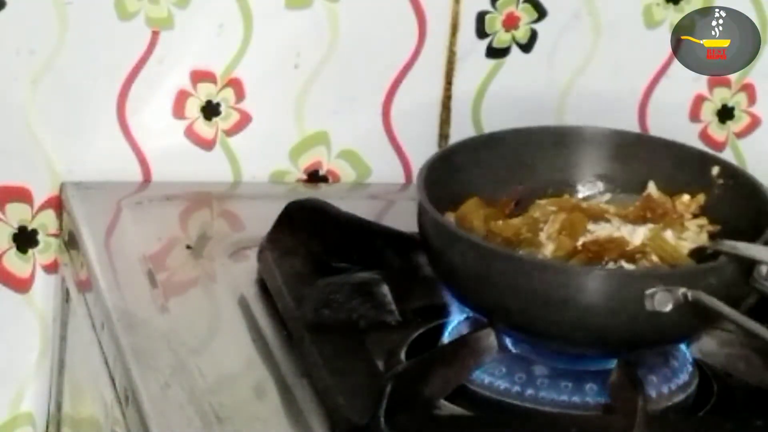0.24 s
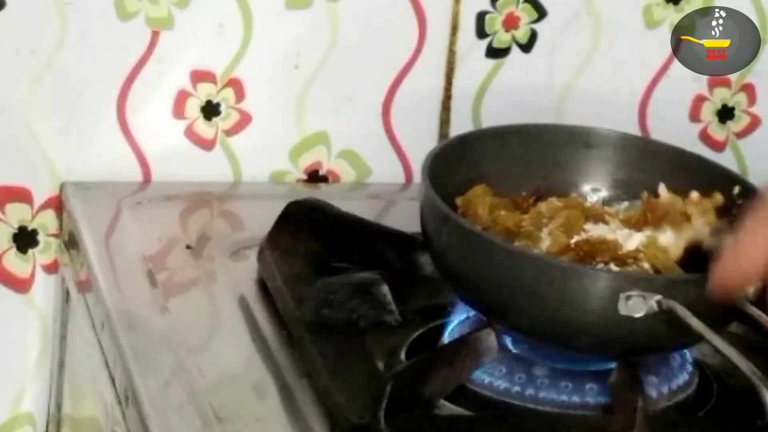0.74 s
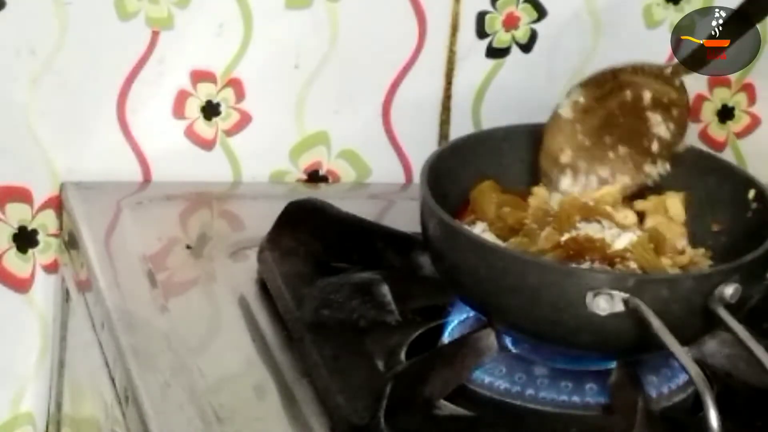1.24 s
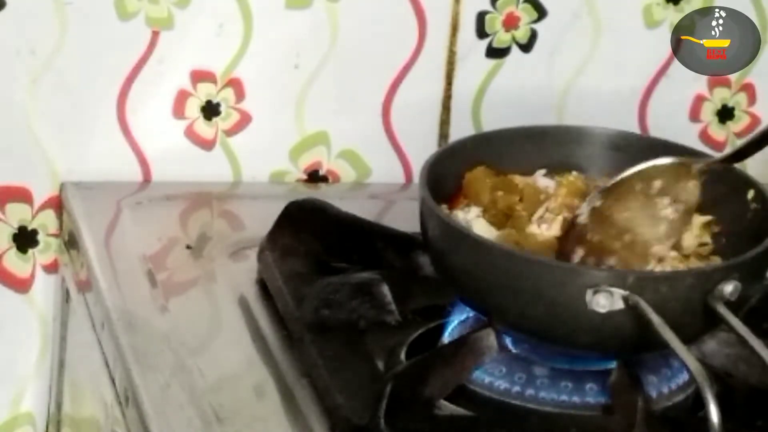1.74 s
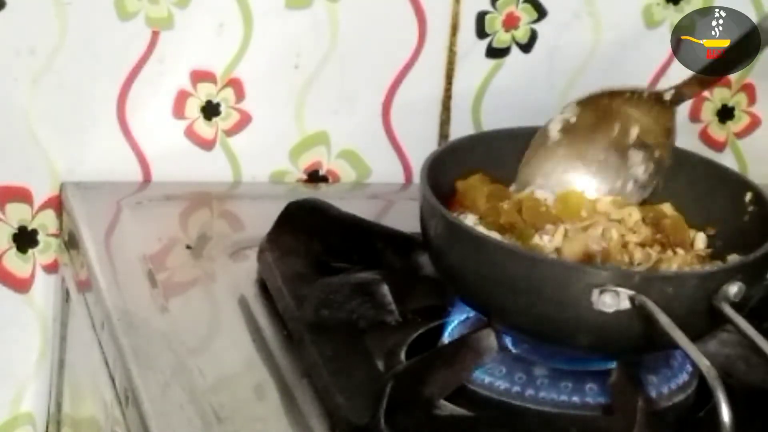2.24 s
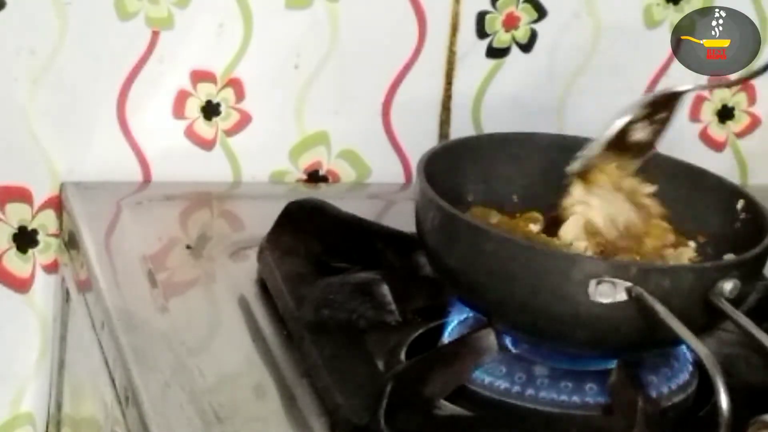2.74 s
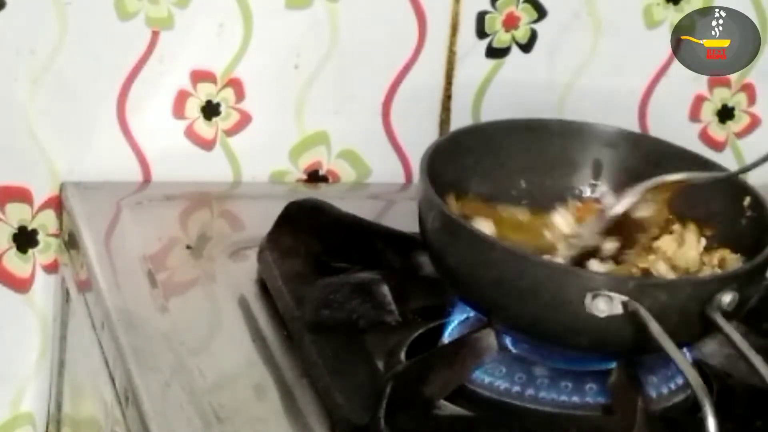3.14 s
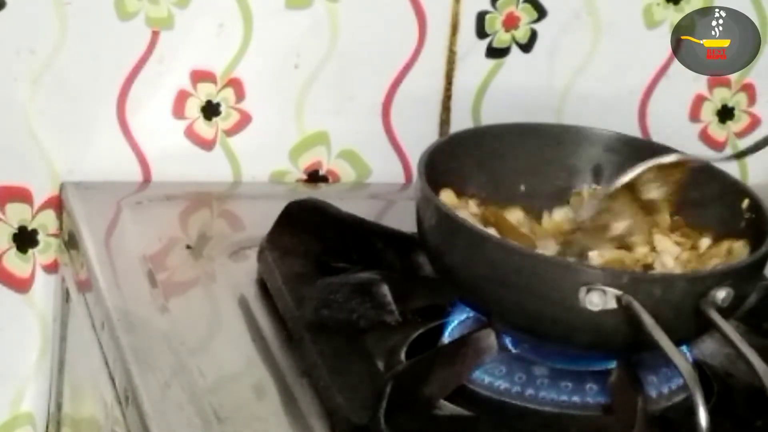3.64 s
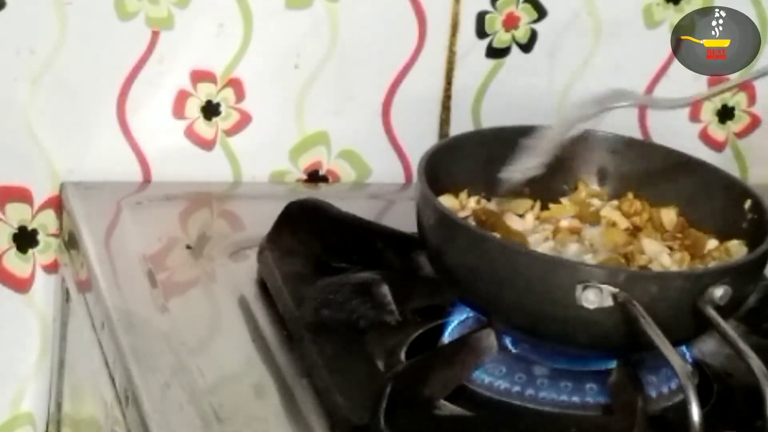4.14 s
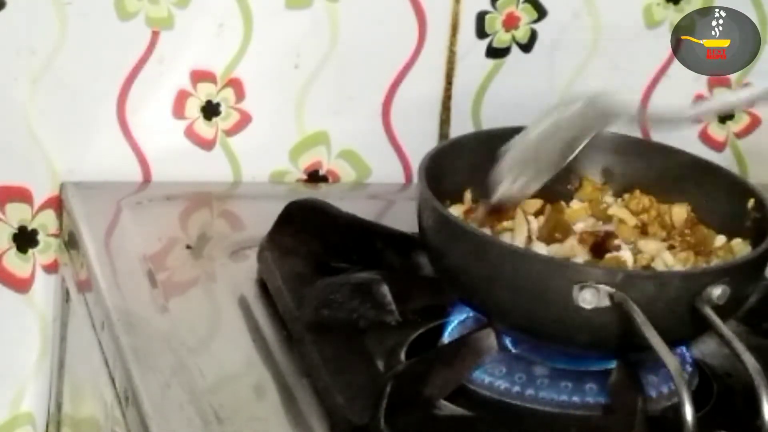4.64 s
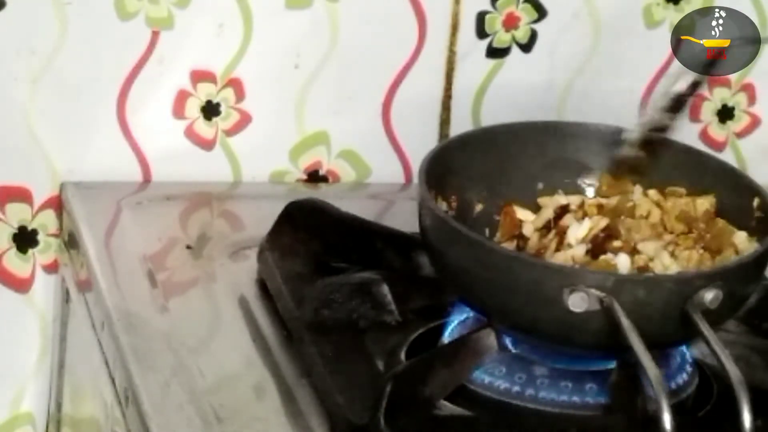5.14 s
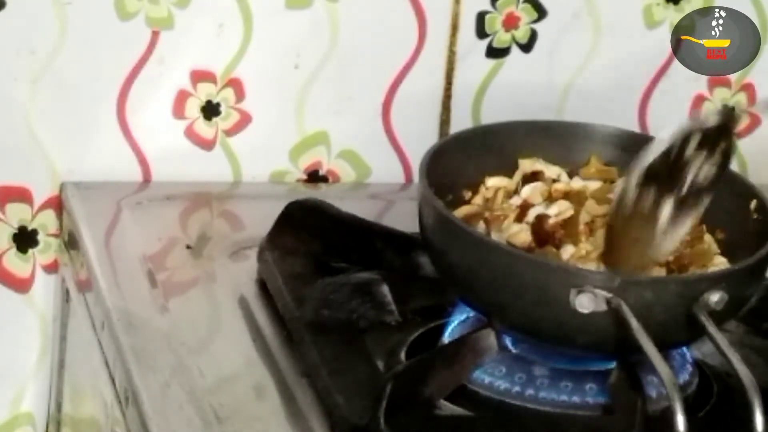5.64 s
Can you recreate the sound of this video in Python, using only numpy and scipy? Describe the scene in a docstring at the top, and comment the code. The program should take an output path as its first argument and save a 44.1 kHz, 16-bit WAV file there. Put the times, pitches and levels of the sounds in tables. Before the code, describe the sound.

Nuts crackle and fizz sharply in hot fat while a steel spoon knocks the pan in scattered clusters, in a small hard kitchen.

```python
"""Chopped nuts fry in hot fat: pops (short noise bursts around a pitch) over a fine fizz and a dull rustle
(noise grains near, hiss far). A steel spoon knocks the pan (struck modes plus a crunch) and squeaks on it
(band-passed uneven noise). Under them lie a low gas-flame roar (shaped noise) and a draught on the left only.
A small hard kitchen (early echoes, decaying noise tail) throws the pan sounds back."""
import sys
import numpy as np
from scipy import signal
from scipy.fft import rfft, irfft
from scipy.io import wavfile
from scipy.ndimage import uniform_filter1d

SR = 44100
rng = np.random.default_rng(int(sys.argv[2]) if len(sys.argv) > 2 else 0)


def transcribe(signal):
    """Save signal, clipped to [-1, 1], as a 16-bit WAV file at the path in sys.argv[1]."""
    frames = np.atleast_2d(signal).T
    limited = np.clip(frames, -1, 1)
    pcm = np.round(limited * 32767).astype(np.int16)
    wavfile.write(sys.argv[1], SR, pcm)


N = 260190

# flame and room spectrum, relative: pitch_hz, level_db
FLAME_SPECTRUM = [(8, -58), (20, 10.5), (32, -28.5), (60, -41), (95, -13.5), (140, -28), (300, -28.5),
                  (600, -28), (1000, -33), (3000, -49.5), (15500, -103)]
# draught spectrum, relative: pitch_hz, level_db
DRAUGHT_SPECTRUM = [(2, -17), (7, 1.5), (14, -6), (28, -11), (57, -19), (114, -30.5), (230, -43),
                    (460, -54), (1000, -77)]
# tail of the room by band: pitch_hz, t60_s, level_db
ROOM_BANDS = [(200, 0.32, 5.5), (850, 0.31, 0), (2600, 0.34, 3.5), (6400, 0.22, 3.5), (15300, 0.24, 8)]
# counter, splashback, walls, before the band decay: delay_s, level_db
EARLY_ECHOES = [(.0055, -11), (.0085, -10), (.0125, -8), (.018, -13)]
# frying curves, before the near and far gains: time_s, fizz_db, rustle_db
FRYING_LEVELS = [(0.0, -54.5, -56.5), (0.16, -57, -61.5), (0.46, -58, -56.5), (0.61, -56.5, -66.5),
                 (1.3, -60.5, -61), (1.63, -56.5, -55.5), (1.77, -51, -62.5), (1.97, -56.5, -54.5),
                 (2.33, -57, -63.5), (3.16, -58.5, -60.5), (3.32, -63.5, -63), (3.73, -53.5, -61.5),
                 (4.3, -61, -68.5), (4.62, -59.5, -66), (4.96, -65.5, -68.5), (5.14, -59, -60.5),
                 (5.45, -61.5, -67.5), (5.9, -55, -63.5)]
# fizz of the fat, relative: pitch_hz, level_db
FIZZ_SPECTRUM = [(3000, -45), (5000, -13.5), (7000, -5), (9000, 3.5), (11000, 6), (13000, 2),
                 (15500, -12.5)]
# rustle of turned nuts, relative: pitch_hz, level_db
RUSTLE_SPECTRUM = [(500, 4), (1000, 5), (2000, 11.5), (4000, 10), (6000, 10), (9000, 1), (15000, -55)]
# spoon edge slipping along the metal: start_s, length_s, pitch_hz, width_hz, level_db
SPOON_SQUEAKS = [(.925, 0.056, 3600, 430, -56.5), (2.1, 0.064, 3730, 260, -52),
                 (2.022, 0.073, 3680, 170, -68), (2.0, 0.061, 1400, 330, -58)]
# pan modes, relative: pitch_hz, level_db, t60_s
PAN_MODES = [(236, 0, .07), (325, -2, .06), (385, -3, .06), (426, -1, .07), (493, -6, .05), (561, -6, .05),
             (605, -2, .07), (667, 0, .05), (710, -2, .045), (817, -9, .07), (1050, -2, .04),
             (1190, 0, .04), (1262, -1, .04), (1393, 1, .07), (1454, -2, .05), (1770, -3, .05),
             (1900, -2, .05), (2060, -2, .04), (2546, -5, .04), (2842, -6, .04), (3110, -4, .05),
             (3460, -4, .05), (3931, -4, .08), (4300, -5, .05), (4645, -4, .05), (5410, -6, .06),
             (5900, -8, .05), (6300, -4, .04), (6530, -3, .06), (7250, -7, .05), (8015, -4, .06),
             (8700, -4, .05), (9848, -2, .06), (10028, 0, .08), (10900, -4, .03), (11704, -3, .06),
             (12395, -3, .06)]
# spoon on pan, hollow knock with a clank above, mode that rings best at that spot:
# start_s, contact_s, knock_db, knock_hz, clank_db, clank_slope_db_per_oct, best_hz, best_extra_db
SPOON_KNOCKS = [(.003, 0.08, -32.5, 417, -71, -6, 325, 2.6), (0.076, 0.0094, -35, 290, -44, -6, 667, 2.3),
                (.245, 0.0065, -43, 403, -84, -2, 426, 3), (0.8722, 0.0014, -65, 410, -45.5, -2, 1850, 4.2),
                (1.815, 0.0023, -27.5, 675, -42, 0.1, 10028, 9),
                (1.821, 0.0075, -32, 405, -46, -5, 2060, 16),
                (1.858, 0.0025, -51, 600, -44.5, -0.5, 3460, 8.5), (1.97, 0.047, -42, 680, -59, 1, 1454, 2),
                (2.054, 0.011, -43, 400, -58.5, 0.5, 1454, 3), (3.517, 0.028, -41, 230, -47, -6, 667, 3.3),
                (3.8633, 0.0022, -23.5, 660, -40, 0.5, 5670, 4.2),
                (3.868, 0.0043, -27.5, 280, -47, -7, 232, 3.95),
                (4.258, 0.0029, -56, 900, -49, -8, 1900, 5.2),
                (4.439, 0.0061, -41, 503, -49.5, -4.5, 607, 5.9),
                (5.5263, 0.0014, -22.5, 680, -36.5, -2.4, 3931, 6),
                (5.529, 0.00093, -44, 400, -51.5, 2, 11704, 11),
                (5.555, 0.014, -32, 424, -36, -2.5, 3931, 6.2),
                (5.574, 0.0019, -42, 430, -48, 1, 1393, 6.6), (5.595, 0.0064, -30.5, 790, -36, -7, 817, 8)]
# bursting steam pockets and nuts ticking on metal: start_s, peak_db, pitch_hz, gain_to_walls_db
MAIN_POPS = [(0.054, -26, 11800, -18), (0.0542, -38, 4500, -17), (0.0598, -18.5, 6100, -7),
             (0.0693, -32, 4930, -10), (0.1034, -22, 8350, -3), (0.112, -32.5, 3260, -4),
             (0.1234, -25.5, 5200, -3.5), (0.2123, -30, 10000, -13), (0.2247, -28, 9300, -5.5),
             (0.371, -31, 9800, -10), (0.412, -38, 8500, 0), (0.493, -34.5, 9700, 4.5),
             (0.5218, -33, 4500, -1.5), (0.5505, -31, 11500, -10), (0.5648, -32, 2160, -8.5),
             (0.5895, -48, 2600, -4), (0.806, -34, 3900, -2), (0.8097, -39, 7900, -11),
             (0.8505, -26.5, 9100, 6), (0.862, -33, 10300, -16), (0.8733, -30, 2520, -2),
             (1.0165, -38, 10700, 9), (1.051, -24, 9100, -4.5), (1.1831, -27.5, 8400, 4),
             (1.289, -23.5, 12300, -2.5), (1.3917, -44.5, 1850, -3), (1.4013, -36.5, 7440, 2.5),
             (1.513, -35.5, 4000, 0.5), (1.5425, -28.5, 9900, -0.5), (1.543, -31, 4200, -9),
             (1.664, -35.5, 3900, -4), (1.7286, -35, 10000, -9), (1.7897, -28.5, 8540, -3),
             (1.8455, -22, 10000, -4.5), (1.939, -40.5, 2640, -4), (1.94, -34.5, 7950, 3),
             (2.11, -51, 4500, -12), (2.1594, -31.5, 5800, -4), (2.178, -36, 11600, 4),
             (2.2608, -31, 8800, -3), (2.3637, -43, 2710, -2), (2.392, -36.5, 9700, 5),
             (2.417, -37.5, 1530, -4), (2.5702, -24.5, 10000, -0.5), (2.629, -31.5, 11700, 1),
             (2.729, -32, 13000, -1), (2.7435, -32, 11500, 2.5), (2.781, -34.5, 5700, -5),
             (2.851, -38, 8680, -10), (2.9539, -27.5, 9200, 2), (3.049, -33.5, 8600, 2.5),
             (3.1442, -30, 11800, -6), (3.2287, -38, 10300, 9), (3.303, -25, 10000, 1.5),
             (3.433, -35, 11600, -2), (3.45, -32, 11600, 2.5), (3.5015, -25.5, 12200, -7),
             (3.5075, -31, 12000, -16), (3.5357, -52, 4500, -6), (3.58, -35, 8290, -8),
             (3.6095, -37, 11500, -12), (3.6177, -29.5, 10900, 4.5), (3.6988, -32, 8200, -6),
             (3.765, -42, 6700, -23), (3.7865, -36, 9780, -4), (3.8012, -32, 11700, -19),
             (3.826, -20, 10200, -6), (3.9886, -35.5, 6800, -0.5), (4.0304, -34, 11500, 4),
             (4.11, -46.5, 1740, -3), (4.1544, -24, 10950, -4.5), (4.273, -44, 7900, -1),
             (4.411, -46, 1300, -6), (4.611, -35, 9200, -3), (4.627, -43.5, 2900, 3),
             (4.7036, -24, 8400, -7), (4.881, -43.5, 8400, 2.5), (4.916, -38, 9200, -5),
             (5.0995, -32.5, 11800, -1), (5.124, -32, 9550, 2.5), (5.2465, -40.5, 3840, -9),
             (5.2556, -38, 8100, -5), (5.2925, -37, 10600, -7), (5.327, -35, 11500, -6),
             (5.4375, -39, 11500, -12), (5.7787, -37, 11680, 3)]

FLAME_DB, DRAUGHT_DB = -50, -19.5  # rms
TOP_HZ = 15450  # upper limit of everything but direct pops and draught
EDGE_HZ = 16400  # upper limit of the whole mix
PAN_TO_ROOM_DB = -0.5  # spoon sounds sent to the walls

BELOW_DB_PER_OCT, ABOVE_DB_PER_OCT = 11, 12.5  # fall of the hollow knock either side of its pitch
CLANK_HZ, CLANK_TOP_HZ = 970, 16600  # knock gives way to clank; clank dies away
CRUNCH_DB, CRUNCH_RISE_S = 31, 0.0012

POP_OCTAVES, SNAP_OCTAVES, SPRAY_OCTAVES = 0.17, 1.48, 0.77  # Gaussian half-widths at 1/e
SNAP_DB, SNAP_DB_PER_DB, BIG_POP_DB = -10, 0.15, -11.5  # snap gain at a big pop, and its growth with size
POP_DECAY_S, PAN_WALL_DB = 0.00035, -5
SIDE_DB = 3  # left-right spread from pop to pop
SMALL_PER_S, SMALL_BASE_DB, SMALL_SPREAD_DB = 45, -62.5, 9
SMALL_LOW_HZ, SMALL_HIGH_HZ = 4500, 13900


def amp(db):
    """Decibels to gain."""
    return 10 ** (np.asarray(db) / 20)


def evened(x):
    """Scales to rms 1."""
    return x / np.sqrt(np.mean(x ** 2) + 1e-20)


def by_pitch(points, hz, order=1):
    """Reads one table column on a log-frequency axis."""
    table = np.transpose(points)
    return np.interp(np.log(hz + 1), np.log(table[0] + 1), table[order])


def by_time(rows, order=1):
    """Reads one table column at every sample."""
    table = np.transpose(rows)
    return np.interp(np.arange(N) / SR, table[0], table[order])


def colour(x, points):
    """Imposes a spectrum, rms 1."""
    gain = amp(by_pitch(points, np.fft.rfftfreq(N, 1 / SR)))
    return evened(irfft(rfft(x) * gain, N))


def add(mix, start_s, sound):
    """Mixes a sound in at start_s."""
    part = mix[..., round(start_s * SR):][..., :sound.shape[-1]]
    part += sound[..., :part.shape[-1]]


def low_pass(x, hz):
    """Steep linear-phase cut above hz."""
    taps = signal.firwin(511, hz, window=("kaiser", 9), fs=SR)
    return signal.oaconvolve(x, taps[None], "same")


def flame():
    """Steady low roar of burner and room: shaped noise, partly shared by both channels."""
    a, b, both = rng.standard_normal((3, N))
    left = colour(a + .7 * both, FLAME_SPECTRUM)
    right = colour(b + .7 * both, FLAME_SPECTRUM)
    return amp(FLAME_DB) * np.array([left, right])


def draught():
    """Steady turbulence, low-frequency noise on the left only."""
    left = amp(DRAUGHT_DB) * colour(rng.standard_normal(N), DRAUGHT_SPECTRUM)
    return np.array([left, 0 * left])


def kitchen(x):
    """Early echoes, then random taps that build up and die band by band, differing left and right."""
    taps = np.zeros((2, SR // 2))
    starts = np.arange(200, SR // 2 - 16, 16)
    at = starts + rng.integers(0, 16, (2, len(starts)))
    build_up = 1 - np.exp(-(at - 200) / 19.0)
    np.put_along_axis(taps, at, rng.choice([-1., 1.], at.shape) * build_up, 1)
    taps *= amp(-14)
    skews = rng.uniform(0, 10, (len(EARLY_ECHOES), 2))  # samples
    for (delay_s, level_db), skew in zip(EARLY_ECHOES, skews):
        taps[[0, 1], (delay_s * SR + skew).astype(int)] += amp(level_db)
    hz, t, z = signal.stft(taps, SR, nperseg=256)
    same = (1 / (1 + (hz / 720.0) ** 2))[:, None]  # long waves reach both sides alike
    z[1] = same * z[0] + np.sqrt(1 - same ** 2) * z[1]
    level_db = by_pitch(ROOM_BANDS, hz, order=2)[:, None]
    t60_s = by_pitch(ROOM_BANDS, hz)[:, None]
    z *= amp(level_db - 60 * t / t60_s)
    tail = rfft(signal.istft(z, SR, nperseg=256)[1], SR)
    # smooth fine spectral ripple, for an even tail
    fine, broad = (uniform_filter1d(abs(tail) ** 2, size=width_hz) for width_hz in (30, 400))
    tail = irfft(tail * np.sqrt(broad / (fine + 1e-20)))[:, :SR // 2]
    return signal.fftconvolve(x[None], tail, axes=1)[:, :N]


def hiss(points, same, patchy_db, flicker_db):
    """Stereo noise with drifting patches and an all-pitch flicker; same = left-right likeness."""
    frames, hz = N // 128 + 5, np.fft.rfftfreq(512, 1 / SR)
    a, b, c, d, patches = rng.standard_normal((frames, 257, 5)).T
    patches = uniform_filter1d(patches, size=8, axis=0)
    patches = evened(uniform_filter1d(patches, size=20, axis=1))
    flicker = evened(uniform_filter1d(rng.exponential(1, frames) - 1, size=5))
    left = a + 1j * b
    right = same * left + np.sqrt(1 - same ** 2) * (c + 1j * d)
    gain_db = by_pitch(points, hz)[:, None] + patchy_db * patches + flicker_db * flicker
    z = np.array([left, right]) * amp(gain_db)
    return evened(signal.istft(z, nperseg=512, noverlap=384)[1][:, :N])


def grains(per_s, spread_db, points, octaves):
    """Tiny bursts at random moments, a few large, each around one of ten pitches."""
    size = amp(spread_db * np.minimum(rng.exponential(1, N), 4)) * rng.choice([-1., 1.], N)
    size *= rng.random(N) < per_s / SR
    kind, hz, spectrum = rng.integers(0, 10, N), np.fft.rfftfreq(N, 1 / SR), 0
    for k, pitch_hz in enumerate(np.geomspace(points[1][0], points[-1][0], num=10)):
        band = np.exp(-(np.log2((hz + 1) / pitch_hz) / octaves) ** 2)
        spectrum = spectrum + rfft(size * (kind == k)) * band
    return colour(irfft(spectrum, N), points)


def frying():
    """Treble fizz of the fat and duller rustle of nuts being turned: grains near, hiss wash far."""
    fizz, rustle = amp(by_time(FRYING_LEVELS)), amp(by_time(FRYING_LEVELS, order=2))
    crackle = grains(700, 5.5, FIZZ_SPECTRUM, .3)
    ticks = grains(300, 5, RUSTLE_SPECTRUM, .35)
    near = amp(-6.5) * fizz * crackle + amp(-8.0) * rustle * ticks
    far_fizz = hiss(FIZZ_SPECTRUM, .05, 3, 3)
    far_rustle = hiss(RUSTLE_SPECTRUM, .15, 3, 2.)
    wash = amp(2.0) * fizz * far_fizz + amp(1.5) * rustle * far_rustle
    return near, wash


def squeaks():
    """Uneven slips of the spoon edge excite one resonance: stepped noise through a band-pass."""
    out = np.zeros(N)
    for start_s, length_s, pitch_hz, width_hz, level_db in SPOON_SQUEAKS:
        edges_hz = [pitch_hz - width_hz / 2, pitch_hz + width_hz / 2]
        band = signal.butter(2, edges_hz, "band", fs=SR, output="sos")
        slips = rng.standard_normal(8192) * np.repeat(rng.exponential(1, 64), 128)
        rub = signal.sosfilt(band, slips)[-round(length_s * SR):]
        add(out, start_s, amp(level_db) * evened(rub) * signal.windows.tukey(len(rub), .5))
    return out


def blow_db(hz, knock_db, knock_hz, clank_db, slope_db_per_oct):
    """Drive of a blow at each pitch: a hollow knock with a clank above it."""
    octaves = np.log2((hz + 1) / knock_hz)
    knock = amp(knock_db + np.minimum(BELOW_DB_PER_OCT * octaves, -ABOVE_DB_PER_OCT * octaves))
    above = (hz + 1) / CLANK_HZ
    clank = amp(clank_db + slope_db_per_oct * np.log2(above)) * above ** 2 / (1 + above ** 2)
    clank /= 1 + (hz / CLANK_TOP_HZ) ** 6
    return 20 * np.log10(knock / (1 + above ** 4) + clank)


def knocks():
    """A blow and its rough contact drive decaying pan modes and a crunch of nuts under the spoon."""
    out, t, bins_hz = np.zeros(N), np.arange(8192) / SR, np.fft.rfftfreq(8192, 1 / SR)
    thin = bins_hz ** 3 / (bins_hz ** 3 + 1100 ** 3)  # small pieces give no bass
    hz, mode_db, t60_s = np.transpose(PAN_MODES)[:, :, None]
    swell = 1 - np.exp(-t * hz / 4.5)  # low modes take a few cycles to speak
    noises = rng.standard_normal((len(SPOON_KNOCKS), 2, 8192))
    for (start_s, contact_s, *blow, best_hz, best_db), noise in zip(SPOON_KNOCKS, noises):
        fade = np.exp(-t / contact_s)
        spot_db = best_db * np.exp(-(np.log(hz / best_hz) / .03) ** 2)
        ring = amp(mode_db + spot_db + blow_db(hz, *blow) - 60 * t / t60_s)
        modes = ring * swell * np.sin(2 * np.pi * hz * t)
        force = noise[0] * fade / np.linalg.norm(fade)
        force[0] += 0.002 / contact_s  # a short contact starts with a clean blow
        rung = signal.fftconvolve(modes, force[None], axes=1)
        # each mode keeps its share of the blow
        rung *= (np.linalg.norm(modes, axis=1) / np.linalg.norm(rung, axis=1))[:, None]
        lumps = np.repeat(noise[0, ::64], 64) ** 2  # pieces give way one after another
        grit = noise[1] * lumps * fade * (1 - np.exp(-t / CRUNCH_RISE_S))
        grit = np.roll(grit / np.linalg.norm(grit), 128)  # room for filter pre-ringing
        crunch = irfft(rfft(grit) * amp(blow_db(bins_hz, *blow) + CRUNCH_DB) * thin)
        add(out, start_s, rung.sum(0))
        add(out, start_s - 128 / SR, crunch)
    return out


def small_pops():
    """Rows of mostly faint pops at random moments, levels and pitches, high pitches favoured."""
    rows = []
    for when, size, pitch in rng.random((round(SMALL_PER_S * N / SR), 3)):
        start_s = 0.0072 + when * N / SR
        peak_db = SMALL_BASE_DB - SMALL_SPREAD_DB * np.log(size + 0.069)
        pitch_hz = SMALL_LOW_HZ * (SMALL_HIGH_HZ / SMALL_LOW_HZ) ** np.sqrt(pitch)
        rows.append((start_s, peak_db, pitch_hz, -6.))
    return rows


def pops():
    """A bursting pocket: brief noise around its pitch over a wide snap that grows with size."""
    out, t, hz = np.zeros((3, N)), np.arange(1024) / SR, np.fft.rfftfreq(1024, 1 / SR)
    rows = MAIN_POPS + small_pops()
    late_s = np.maximum(t - 256 / SR, 0)  # room for filter pre-ringing
    noises = rng.standard_normal((len(rows), 1024))
    for (start_s, peak_db, pitch_hz, room_db), noise in zip(rows, noises):
        burst = noise * (late_s > 0) * np.exp(-late_s / POP_DECAY_S)
        burst[257] += 4  # the skin of the pocket tears at once
        torn = rfft(burst) / (1 + (hz / 15200) ** 24)
        octaves = np.log2((hz + 1) / pitch_hz)
        band = np.exp(-(octaves / POP_OCTAVES) ** 2)
        snap_gain = amp(SNAP_DB + SNAP_DB_PER_DB * (peak_db - BIG_POP_DB))
        snap = snap_gain * np.exp(-(octaves / SNAP_OCTAVES) ** 2)
        pop = irfft(torn * (band + snap))
        pop = amp(peak_db) * pop / abs(pop).max()
        spray = irfft(torn * np.exp(-(octaves / SPRAY_OCTAVES) ** 2))  # the walls hear a wider band
        spray = amp(peak_db) * spray * np.sqrt(45000 / pitch_hz) / np.linalg.norm(spray)
        direct = pop + amp(PAN_WALL_DB) * np.roll(pop, 48)  # thrown back by the far wall of the pan
        side = amp(SIDE_DB * noise[0] / 2)  # its place in the pan
        add(out, start_s - 256 / SR, np.array([direct * side, direct / side, amp(room_db) * spray]))
    return out


def scene():
    """Direct pan sounds, their echo, and the steady layers."""
    near, wash = frying()
    popped = pops()
    struck = knocks() + squeaks()
    echo = kitchen(popped[2] + near + amp(PAN_TO_ROOM_DB) * struck)
    far = low_pass((echo + wash) * amp([[-.4], [.4]]) + flame(), TOP_HZ)
    direct = popped[:2] + low_pass((struck + near)[None], TOP_HZ)
    return direct * amp([[-.9], [.9]]) + far + draught()


def record(dry):
    """Limits the band."""
    return low_pass(dry, EDGE_HZ)


dry = scene()
out = record(dry)
transcribe(out)
```